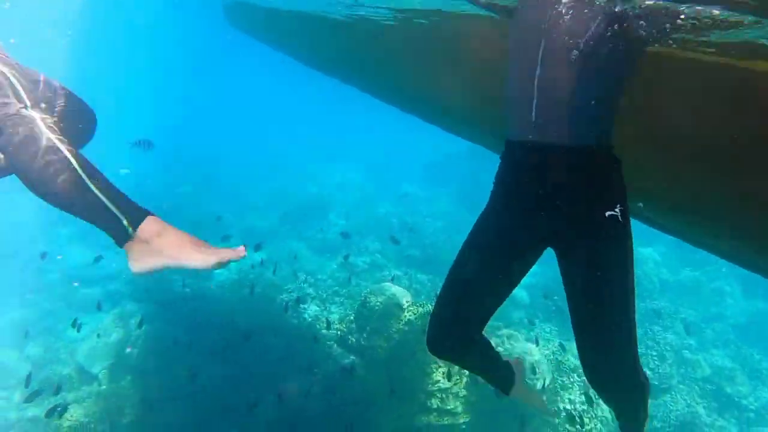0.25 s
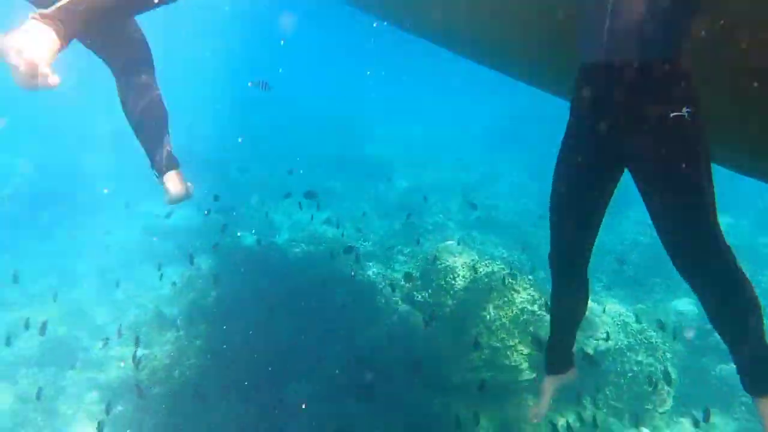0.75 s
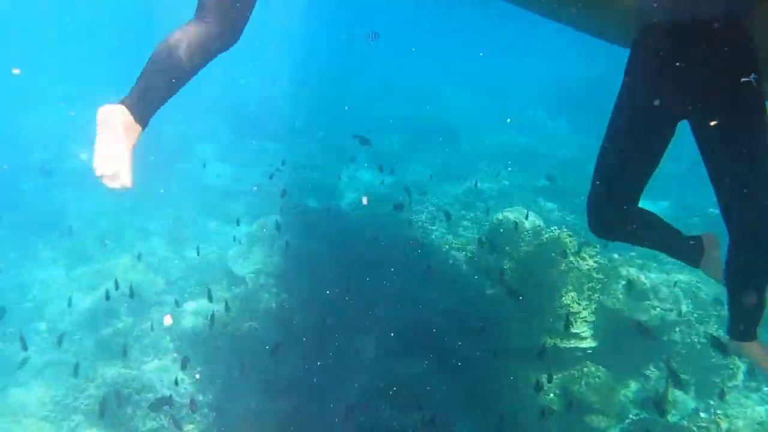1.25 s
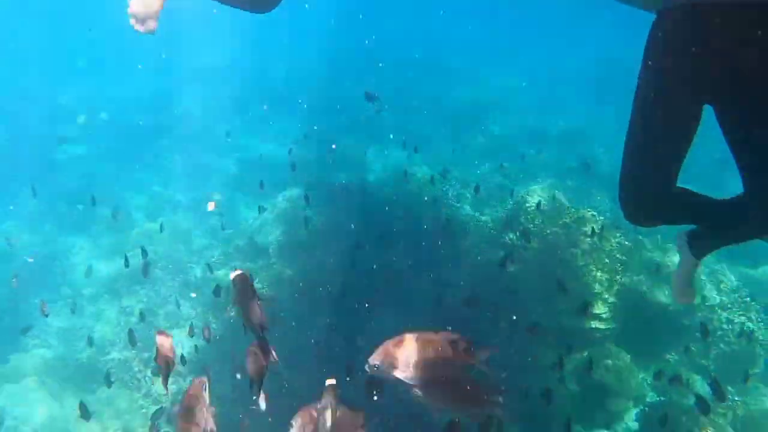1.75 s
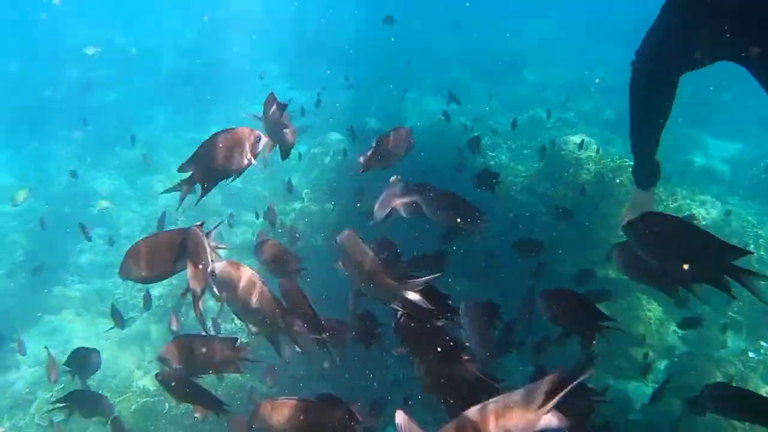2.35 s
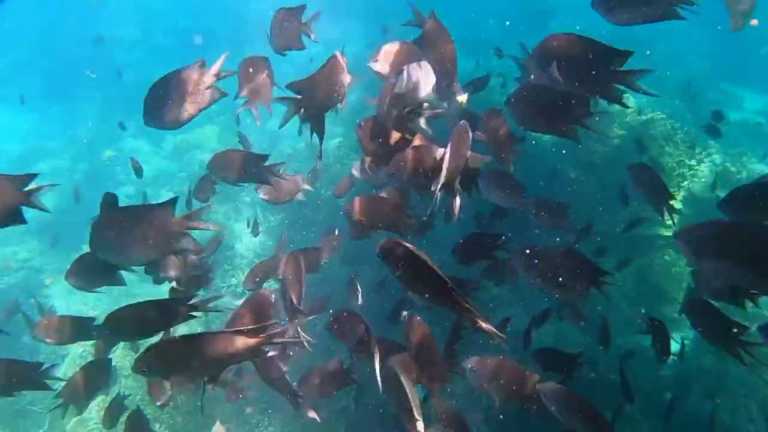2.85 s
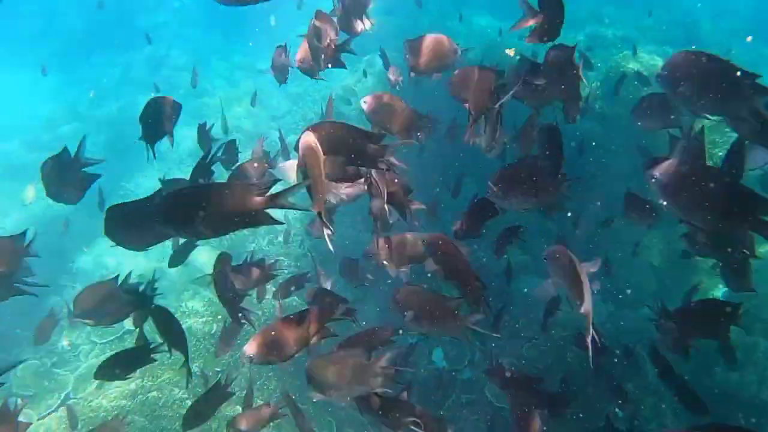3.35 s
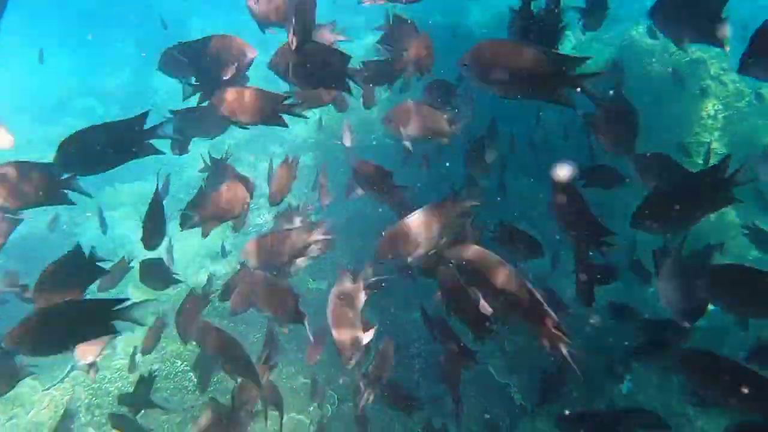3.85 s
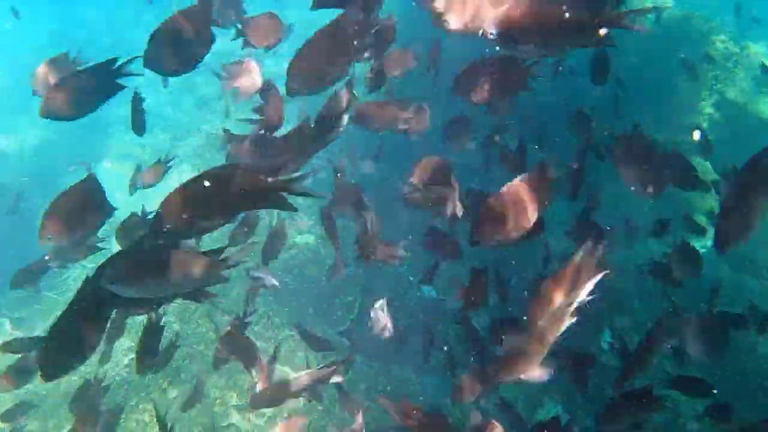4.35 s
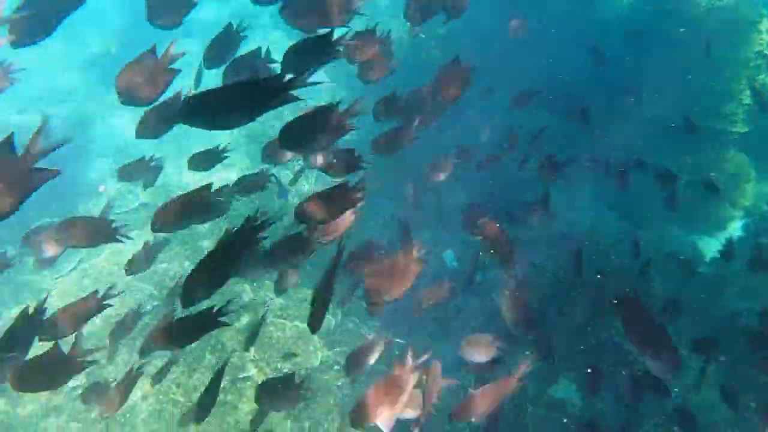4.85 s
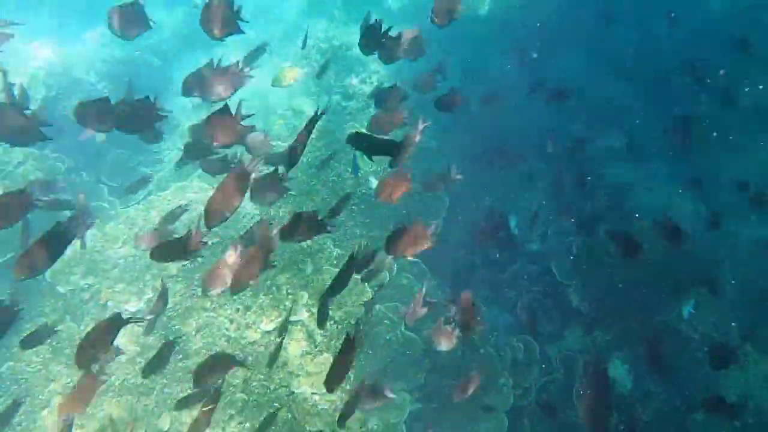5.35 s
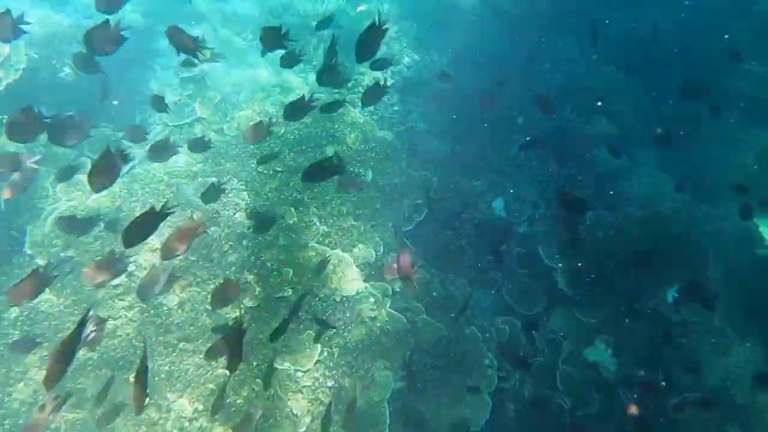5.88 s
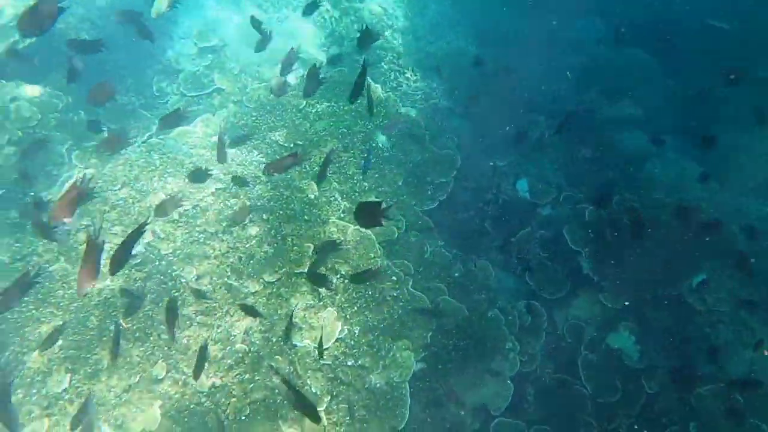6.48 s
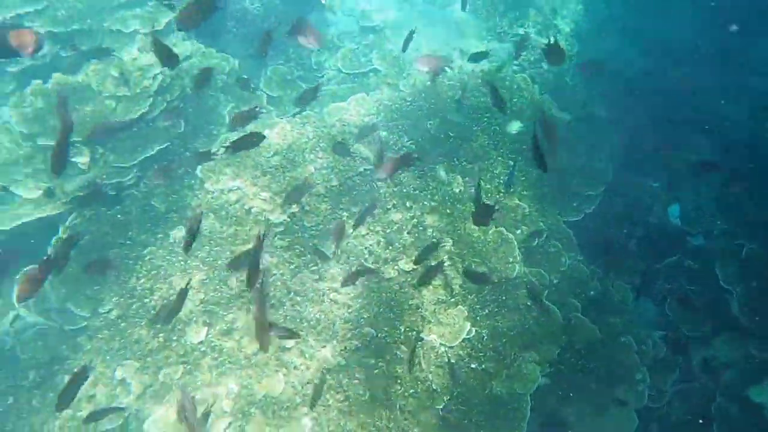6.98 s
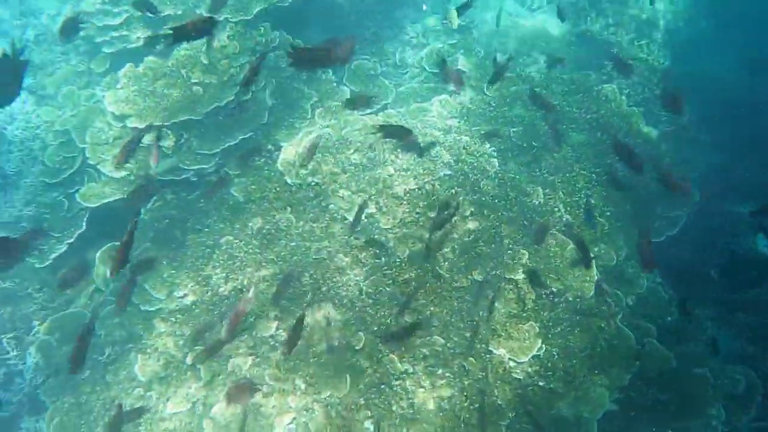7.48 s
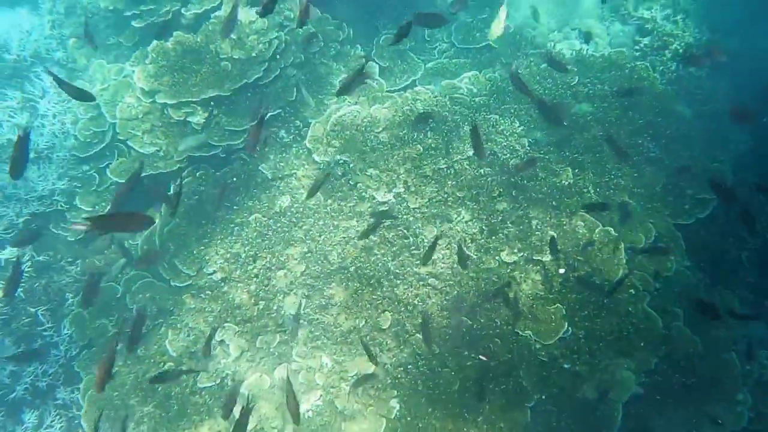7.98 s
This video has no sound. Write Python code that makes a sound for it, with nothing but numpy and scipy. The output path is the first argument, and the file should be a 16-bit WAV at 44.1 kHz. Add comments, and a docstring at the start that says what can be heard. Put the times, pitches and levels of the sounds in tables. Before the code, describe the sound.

Underwater near a coral reef, a boat engine idles with a low, fast throb that swells and recedes. A loose part rattles in buzzing bursts with sharp ticks and small hollow knocks. Water bumps the microphone's waterproof housing with dull, short rings, a few gurgles and small bubbles. Far shrimp crackle faintly. Midway there is a thick cluster of bumps, then churning water grows toward the end. The pickup is close, boxy and muffled.

```python
"""Over a reef, under water: a boat engine idles, heard through a camera's waterproof housing.
Its turns give a low throb of engine orders and noise thuds, hums and knocks; the second order booms in swells.
In spells a loose part rattles, as filtered clicks; sharp bright noise ticks are its louder strikes and some shrimp.
Stray knocks ring the walls. Water bumps the housing (a ring, a splash and a slap), gurgles and bubbles as gliding
tones, and churns as lumpy noise. Far shrimp crackle in the coral as decaying noise clicks."""
import sys
import numpy as np
from scipy import signal
from scipy.fft import rfft, irfft
from scipy.io import wavfile
from scipy.ndimage import uniform_filter1d

SR = 44100
rng = np.random.default_rng(int(sys.argv[2]) if len(sys.argv) > 2 else 0)


def master(y):
    """Save y as 16-bit WAV."""
    cut = np.clip(np.atleast_2d(y).T, -1, 1)
    pcm = np.round(cut * 32767)  # scale
    wavfile.write(sys.argv[1], SR, pcm.astype(np.int16))


N = 362502
TIME = np.arange(N) / SR

# Base level of the hull's thuds: (time [s], level [dB])
THUD_LEVEL = [(0, -34), (.45, -37), (1.25, -29.5), (2.3, -31), (3.2, -24.5), (3.85, -32), (4.7, -30),
              (5.7, -34), (8.2, -34.5)]
# Base level of the engine's knocks: (time [s], level [dB])
KNOCK_LEVEL = [(0, -40.5), (.4, -44.5), (1.35, -38.5), (2, -38), (2.45, -42.5), (3.45, -37.5),
               (3.95, -40.5), (5.1, -38.5), (5.7, -42.5), (8.2, -39)]
# Spectrum of the knocks: (frequency [Hz], level [dB])
KNOCK_COLOUR = [(350, -21.5), (550, -24), (700, -7), (830, -12), (980, -3), (1110, 2.5), (1290, -14.5),
                (1410, -2), (1490, -7.5), (1600, -3), (1760, -1), (1980, -27.5), (2400, -19.5), (3500, -37)]
# Base level of the churning water: (time [s], level [dB])
CHURN_LEVEL = [(0, -46.5), (.5, -51.5), (1.5, -45.5), (2.5, -69), (4.2, -54), (5.0, -39), (5.6, -37),
               (6.4, -33.5), (7.1, -35), (8.2, -33)]
# Water bumping the housing: (time [s], level [dB], ring T60 [s], dull slap against the ring [dB])
BUMPS = [(0.264, -18.5, 0.12, -12), (1.253, -13, 0.12, -14), (1.368, -18.5, .08, -3), (1.384, -16, .13, -7),
         (1.682, -13, 0.11, -9), (1.773, -17, 0.13, -9), (2.116, -19, .11, -9), (3.449, -15.5, 0.11, -9.5),
         (4.392, -19, .12, -1), (4.764, -18.5, .1, -10.5), (4.909, -14, .08, -7), (4.921, -18.5, 0.055, 3),
         (4.936, -15.5, .04, 6.5), (4.949, -9, .15, -2), (4.984, -19.5, .1, 1.5), (5.286, -18, .08, -3.5),
         (5.467, -22.5, .05, 0), (5.897, -17, 0.08, -8), (6.19, -14, .1, -10), (6.277, -15, 0.088, -1.5),
         (6.405, -15.5, 0.13, -10), (6.819, -8, .13, -15), (6.867, -10.5, 0.15, -18),
         (7.07, -16.5, 0.16, -8), (7.375, -17, .12, -10.5)]
# Treble resonances of the housing: (frequency [Hz], width [Hz], lift [dB])
HOUSING = [(2886, 380, 4.5), (4136, 130, 5.5), (4720, 220, 6), (5350, 220, 6.5), (5840, 140, 7),
           (6540, 220, 6), (7540, 600, 5), (9950, 470, 4)]


def amp(db):
    """Decibels to gain."""
    return 10 ** (np.asarray(db) / 20)


def unit(x):
    """Scales to rms 1."""
    return x / np.sqrt(np.mean(x ** 2) + 1e-20)


def curves(table):
    """All columns of a time table at every sample."""
    s, *columns = np.transpose(table)
    return [np.interp(TIME, s, column) for column in columns]


def read(points, hz):
    """Reads a spectrum table on a log-frequency axis."""
    f, value = np.transpose(points)
    return np.interp(np.log(hz + 1), np.log(f + 1), value)


def add(mix, s, sound):
    """Mixes a sound in at time s."""
    part = mix[max(round(s * SR), 0):][:len(sound)]
    part += sound[:len(part)]


def hiss():
    """White noise."""
    return rng.standard_normal(N)


def drift(hz, size=N):
    """Smooth random wander, scaled to rms 1, mostly slower than hz."""
    f = np.fft.rfftfreq(2 ** 19, 1 / SR)
    f = f[f < 4 * hz]
    z = rng.standard_normal((len(f), 2)) @ [1, 1j] * np.exp(-(f / hz) ** 2)
    # The short inverse transform gives one point per 32 samples
    slow = unit(irfft(z, 2 ** 14))
    return np.interp(np.arange(size) / 32, np.arange(len(slow)), slow)


def colour(x, points, peaks=(), size=4096):
    """Minimum-phase filter of unit energy with the given spectrum and resonances."""
    hz = np.fft.rfftfreq(size, 1 / SR)
    # Above the table's end the spectrum falls 12 dB an octave
    db = read(points, hz) - 40 * np.log10(np.maximum(hz / points[-1][0], 1))
    db = db + sum(lift / (1 + (2 * (hz - f) / width) ** 2) for f, width, lift in peaks)
    log_gain = np.log(amp(np.r_[db, db[-2:0:-1]]))
    taps = np.fft.ifft(np.exp(np.conj(signal.hilbert(log_gain)))).real
    return signal.oaconvolve(x, taps / np.linalg.norm(taps))[:len(x)]


def blows(cycles, lag, fall, scatter_db):
    """Envelope of one blow a cycle, lag cycles into it, dying by 1/e in fall cycles; strengths vary at random."""
    turn = cycles - lag + 2
    strength = amp(scatter_db * np.clip(rng.standard_normal(512), -3, 1.5))
    return strength[turn.astype(int)] * np.exp(-(turn % 1) / fall)


def ringing(hits, fall_s):
    """Envelope that spreads each click's energy over a short decay."""
    keep = np.exp(-1 / (fall_s * SR))
    return np.sqrt(signal.lfilter([1 - keep], [1, -keep], hits ** 2 + 1e-20))


def throb(cycles, shake, waver=0.2):
    """Exhaust pulses arrive as a stack of sines at engine orders; the second one booms in swells."""
    # First engine order: (time [s], level [dB])
    first_order = [(0.0, -38), (0.68, -20.5), (0.91, -30), (1.0, -23), (1.19, -30), (1.33, -23.5),
                   (1.99, -21), (2.33, -25), (3.9, -23.5), (4.2, -21), (5.1, -31), (5.38, -20), (6.57, -24),
                   (8.22, -20.5)]
    # Third engine order: (time [s], level [dB])
    third_order = [(0.0, -31), (0.04, -28), (4.28, -25), (4.4, -30), (4.67, -23.5), (5.31, -28),
                   (5.52, -24), (6.39, -27.5), (6.64, -22.5), (6.98, -32), (7.26, -22.5), (8.22, -23)]
    # Swells of the second order: (peak time [s], half width to 1/e [s], level before a 1.5 dB trim [dB])
    booms = [(.8, 0.13, -33), (1.27, 0.16, -23.5), (2.15, 0.49, -16.5), (3.7, 0.46, -16),
             (4.55, .45, -24.5), (5.45, 0.18, -20), (5.96, 0.34, -18), (7.15, 0.4, -17)]
    # Higher orders: (engine order, level when the thuds are at overtone_at_db [dB])
    overtones = [(4, -31.5), (5, -36.5), (6, -43.5), (7, -37.5), (8, -43), (9, -43.5), (14, -47.5),
                 (15, -46)]
    second_order_db = -35.5  # floor between the swells
    half_order_db = -33  # order 3.5, while the hull shakes
    overtone_follow, overtone_at_db = 0.44, -30.5  # share of the thuds' dB changes; reference thud level
    spread = 0.177  # cycles of phase, times order squared

    # Higher orders run faster in shallow water: the phase spread smears each pulse into a drone
    def order(k, sway):
        return np.sin(2 * np.pi * (k * cycles + spread * k ** 2) + sway)

    boom = amp(second_order_db)
    boom = boom + sum(amp(db - 1.5) * np.exp(-((TIME - s) / width) ** 2) for s, width, db in booms)
    gains = amp(curves(first_order)[0]), boom, amp(curves(third_order)[0])
    low = sum(gain * (1 + 0.11 * drift(8)) * order(k, 0.12 * drift(7)) for k, gain in enumerate(gains, 1))
    high = sum(amp(db) * (1 + waver * drift(2.4)) * order(round(k), waver * drift(4.9)) for k, db in overtones)
    high = high * amp(overtone_follow * (curves(THUD_LEVEL)[0] - overtone_at_db))
    half = amp(half_order_db) * shake * order(7 / 2, waver * drift(3))
    return np.sqrt(2) * (low + half + high)


def hull(cycles, shake):
    """Every turn thuds in the hull and sets the housing humming; a four-stroke firing knocks on every second turn."""
    # Spectra of thud and hum: (frequency [Hz], level [dB])
    thud_colour = [(30, -18.5), (60, 3), (100, -3), (130, 2.5), (195, -1.5), (250, -5), (300, -12.5),
                   (420, -34), (700, -46.5)]
    hum_colour = [(180, -38), (290, -13.5), (340, -3.5), (370, 7), (400, -2), (450, -11), (520, -28.5),
                  (900, -54)]
    # Low resonance of the hull: (frequency [Hz], width [Hz], lift [dB])
    hull_mode = [(198, 78, 1.5)]
    hum_db = -45  # without shaking or churning
    shake_thud_db, shake_hum_db = 2.5, 5.5  # boost at full shaking
    hum_over_churn_db = 5  # churning water also sets the housing humming

    thud_db = curves(THUD_LEVEL)[0] + shake_thud_db * shake
    shaken_hum = amp(hum_db + shake_hum_db * shake)
    churned_hum = amp(curves(CHURN_LEVEL)[0] + hum_over_churn_db)
    knock_db = curves(KNOCK_LEVEL)[0]

    thuds = blows(cycles, lag=0.85, fall=0.16, scatter_db=2)
    shakes = blows(cycles, lag=0.03, fall=0.15, scatter_db=2)
    valves = blows(cycles, lag=0.83, fall=0.12, scatter_db=3.5)
    valves = valves + blows(cycles, lag=0.99, fall=0.08, scatter_db=3.5)
    firing = blows(cycles / 2, lag=0.495, fall=0.055, scatter_db=4)
    # Blunted attacks over an uneven steady bed
    strokes = uniform_filter1d(0.5 * valves + 0.75 * firing, size=70) + 0.38 * amp(2.5 * drift(45))

    thud = unit((0.5 + thuds) * hiss()) * amp(thud_db + 0.67)
    hum = unit((0.37 + shakes) * hiss()) * np.hypot(shaken_hum, churned_hum)
    knock = unit(strokes * hiss()) * amp(knock_db - 0.53 + drift(3.1))
    return colour(thud, thud_colour, hull_mode) + colour(hum, hum_colour) + colour(knock, KNOCK_COLOUR)


def spells():
    """Each spell sets in, holds and dies away under an arch of shaking: rattle gain, shaking, strike advance."""
    # Rattling: (start [s], end [s], level at start [dB], level at end [dB], greatest strike advance [cycles])
    spell_list = [(0, 0.106, -54.5, -54, 0), (0.669, 1.651, -45, -45.5, 0.088),
                  (1.72, 2.45, -59.5, -62.5, 0.018), (2.522, 3.438, -52, -45, .13),
                  (4.228, 5.257, -49.5, -53, .16), (6.169, 6.927, -49.5, -51, .15),
                  (7.482, 8.199, -59, -55.5, 0.0085)]
    attack_s, release_s, idle_db = 0.066, 0.11, -72.5  # attack and release times are per 20 dB
    full_shake_db = -50  # spells that start fainter shake the hull less

    gain, shake, advance = np.full(N, amp(idle_db)), np.zeros(N), np.zeros(N)
    for start, end, start_db, end_db, ahead in spell_list:
        outside = np.maximum((start - TIME) / attack_s, (TIME - end) / release_s)
        held_db = np.interp(TIME, [start, end], [start_db, end_db])
        gain += amp(held_db - 20 * np.clip(outside, 0, 10))
        arch = np.sin(np.pi * np.clip((TIME - start) / (end - start), 0, 1) ** 1.17)
        shake += arch * min(amp(start_db - full_shake_db), 1)
        advance += ahead * arch ** 0.75
    return gain, shake, advance


def bounce(x):
    """A click crosses the housing back and forth: feedback delays make a quick train of echoes."""
    for delay_s in (0.0006, 0.00047):  # round trips
        loop = np.r_[1, np.zeros(round(delay_s * SR) - 1), -0.45]  # share kept on each trip
        x = signal.lfilter(loop[::-1], loop, x)  # all-pass: keeps the click's spectrum
    return x


def rattle(cycles, gain, advance):
    """The loose part strikes once a turn with a sharp tick, falls back more softly and chatters when shaken hard."""
    # Spectrum of the ticks: (frequency [Hz], level [dB])
    rattle_colour = [(1180, -38), (2000, -1.5), (2200, -13), (2480, -7), (2860, 0.5), (3430, -20),
                     (3840, -11.5), (4120, -2.5), (4640, -4), (5060, -11.5), (5420, -8.5), (6590, -12),
                     (7060, -17.5), (7710, -15.5), (8960, -29.5), (11600, -42.5), (19700, -120)]
    strike_lag, rebound_lag, jitter = 0.16, 0.431, 0.011  # cycles
    rebound_share = 0.45  # strength against the strike
    strike_scatter_db, rebound_scatter_db = 1.7, 4
    limp = 0.12  # share of the advance by which alternate turns differ from it
    chatter_per_s, chatter_at_db = 60, -44  # slip rate at this rattle level; grows with gain squared
    grit_db, grit_s = -1.5, 0.0014  # rough contact adds a little noise to each tick
    clatter_hz, clatter_wander, clatter_db = 2780, 0.08, -12  # the part's own ring, different at each strike

    turns = np.arange(int(cycles[-1]) + 1)
    ahead = np.interp(turns, cycles, advance)
    strike = strike_lag - ahead * (1 - limp * (-1) ** turns), 1, strike_scatter_db
    rebound = rebound_lag - ahead / 2, rebound_share, rebound_scatter_db
    slips_per_s = chatter_per_s * (gain / amp(chatter_at_db)) ** 2
    hits = (rng.random(N) < slips_per_s / SR) * rng.random(N) / 2
    for lag, share, scatter_db in strike, rebound:
        slip, force = rng.standard_normal((len(turns), 2)).T
        at = np.searchsorted(cycles, turns + lag + jitter * slip)
        inside = at < N
        hits[at[inside]] += share * amp(scatter_db * np.minimum(force, 1))[inside]
    # One unit tick a turn, with its grit, would have rms equal to the gain
    hits *= gain * np.sqrt(N / len(turns) / (1 + amp(2 * grit_db)))
    grit = amp(grit_db) * ringing(hits, grit_s) * hiss()
    angle = 2 * np.pi * np.cumsum(clatter_hz * (1 + clatter_wander * drift(25))) / SR
    wandering_ring = drift(200) * np.sin(angle) + drift(200) * np.cos(angle)
    clatter = ringing(hits, 0.0018) * wandering_ring
    return colour(bounce(hits + grit), rattle_colour, HOUSING) + amp(clatter_db) * clatter


def bright_ticks():
    """Sharp bright ticks, louder strikes of the loose part and some shrimp snaps: brief noise with a lifted band."""
    # Spectrum of the ticks: (frequency [Hz], level [dB])
    tick_colour = [(900, -25.5), (1900, -3), (2900, -2.5), (3450, -5), (4400, -3), (6500, -3),
                   (8000, -11.5), (9500, -22), (12000, -31.5), (14000, -43.5)]
    # (time [s], level before a 4 dB trim [dB], lifted frequency [Hz])
    ticks = [(.578, -29, 5500), (0.599, -31.5, 7000), (0.788, -22, 4830), (1.0928, -25.5, 2910),
             (1.5, -24.5, 2870), (1.616, -28, 7000), (1.627, -27, 4520), (1.923, -25, 2790),
             (2.229, -30.5, 2180), (2.508, -23, 2870), (3.405, -22, 2860), (3.9432, -30, 3070),
             (4.7345, -28.5, 4660), (5.8, -36, 3000), (6.8662, -28.5, 2330), (7.2672, -28, 3010),
             (7.517, -32, 6000), (7.6413, -18.5, 2330), (7.863, -37, 5520), (7.978, -32, 7000),
             (7.9886, -22, 3020)]
    out, t = np.zeros(N), np.arange(SR // 20) / SR
    for s, db, hz in ticks:
        burst = (np.exp(-t / 0.0015) + 0.12 * np.exp(-t / 0.009)) * rng.standard_normal(len(t))
        add(out, s, amp(db - 4.0) * colour(burst, tick_colour, HOUSING + [(hz, 1100, 7)]))
    return out


def knocks():
    """Hard firings, stray knocks and faint random ones ring the housing's walls briefly: a sine and a noise crack."""
    # Stray knocks: (time [s], level [dB], pitch [Hz], ring T60 [s], crack against the ring [dB])
    stray = [(.527, -34.5, 2900, 0.034, -15), (1.057, -24, 1620, 0.036, -8),
             (1.093, -20.5, 2860, 0.021, -15), (1.66, -23.5, 1106, 0.033, -9),
             (1.684, -23, 1690, 0.031, -5), (3.376, -25, 1520, .04, -8), (3.971, -24.5, 1094, .04, -9),
             (4.935, -19, 1040, 0.027, -12), (5.286, -20, 990, 0.038, -5), (6.25, -29, 2760, .03, -12),
             (6.429, -28, 1700, .04, -8), (6.432, -20.5, 734, 0.041, -11), (6.762, -24, 1075, 0.044, -7.5),
             (6.817, -15.5, 1065, 0.017, 0.5), (7.079, -26.5, 1440, 0.023, -2), (7.22, -16, 940, 0.023, -5),
             (7.222, -17, 1425, 0.022, -6), (7.641, -22, 1710, .02, -2.5), (7.812, -22.5, 1000, .04, -7)]
    # Hard firings that ring the wall: (time [s], level [dB])
    hard_firings = [(1.822, -19.5), (1.903, -20), (1.986, -22.5), (2.064, -19.5), (2.145, -28),
                    (2.225, -28.5), (3.283, -29), (3.444, -26.5), (3.523, -22.5), (3.604, -30),
                    (3.687, -20), (3.767, -20.5), (3.849, -31), (4.661, -23.5), (4.74, -20), (4.818, -20.5),
                    (5.165, -20), (5.228, -22), (5.307, -18.5), (5.388, -25.5), (5.466, -23), (5.73, -23.5)]
    # Pitches of the faint knocks: each rings one wall mode [Hz]
    wall_modes = [1000, 1105, 1420, 1760]
    wall_hz, wall_t60_s, wall_crack_db = 1100, 0.035, -11
    small_per_s, small_over_db, small_scatter_db = 9, 6.5, 1  # faint knocks, against the engine's knock level

    out, t = np.zeros(N), np.arange(SR // 8) / SR
    hard = [(s, db, wall_hz, wall_t60_s, wall_crack_db) for s, db in hard_firings]
    small = []
    for s in TIME[rng.random(N) < small_per_s / SR]:
        db = np.interp(s, *np.transpose(KNOCK_LEVEL)) + small_over_db + small_scatter_db * rng.standard_normal()
        small.append((s, db, rng.choice(wall_modes), wall_t60_s, wall_crack_db))
    for s, db, hz, t60, crack_db in stray + hard + small:
        ring = np.sin(2 * np.pi * hz * t)
        crack = colour(rng.standard_normal(len(t)), KNOCK_COLOUR)
        envelope = amp(db + 2.5 - 60 * t / t60) * (1 - np.exp(-t / 0.0023))
        add(out, s, envelope * (ring + amp(crack_db) * crack))
    return out


def bumps():
    """Pushes of water slap the housing, splash and ring its low mode."""
    # Spectrum of the splash: (frequency [Hz], level [dB])
    splash_colour = [(120, -11.5), (260, 8.5), (400, 4.5), (540, -20), (700, -8), (900, -18.5), (1400, -15),
                     (1800, -12.5), (2400, -27.5), (5000, -64.5)]
    ring_hz, rise_s = 367.2, 0.0027  # the ring's pitch varies around this
    splash_db = -19.5
    slap_s = 0.0008  # half width of the slap's pressure pulse

    out, t = np.zeros(N), np.arange(SR // 4) / SR
    u = (t - rise_s) / slap_s
    slap = u * np.exp((1 - u ** 2) / 2)
    for s, db, t60, slap_db in BUMPS:
        hz = ring_hz * (1 + 0.015 * rng.standard_normal() + 0.018 * drift(40, size=len(t)))
        ring = np.sin(2 * np.pi * np.cumsum(hz) / SR) * amp(drift(60, size=len(t)))
        splash = colour(amp(splash_db) * rng.standard_normal(len(t)), splash_colour)
        push = amp(3.5 - 60 * t / t60) * (1 - np.exp(-(t / (2 * rise_s)) ** 2))
        add(out, s - rise_s / 2, amp(db) * (push * (ring + splash) + amp(slap_db) * slap))
    return out


def gurgles():
    """Pockets of air ring and glide in pitch; ragged ones flutter."""
    # (time [s], length [s], level [dB], start pitch [Hz], end pitch [Hz], roughness [0-1])
    air_pockets = [(0.022, 0.03, -13, 205, 228, .05), (0.017, 0.05, -24.5, 370, 360, 0.32),
                   (4.292, 0.055, -23, 490, 450, 0.52), (4.292, .055, -14.5, 400, 385, 0.29),
                   (4.337, 0.05, -13, 362, 393, 0.11), (4.29, 0.097, -22, 280, 290, 0.9),
                   (4.96, 0.064, -18.5, 375, 355, 0.15), (4.89, .075, -24, 175, 290, .3),
                   (4.955, .065, -26.5, 285, 215, .2), (4.955, 0.06, -31.5, 740, 620, 0.5),
                   (4.99, 0.255, -18.5, 162, 88, 0.08), (1.658, .04, -22.5, 205, 350, 0.2),
                   (.81, .03, -41, 1370, 1420, 0.3), (1.1, 0.018, -33.5, 1450, 1390, 0.1),
                   (1.39, 0.022, -34.5, 1400, 1330, 0.2), (3.637, 0.033, -42, 2660, 2750, 0.9)]
    out = np.zeros(N)
    for s, length, db, start_hz, end_hz, rough in air_pockets:
        size = int(length * SR)
        angle = 2 * np.pi * np.cumsum(np.geomspace(start_hz, end_hz, size)) / SR
        spread_hz = 40 + 0.13 * start_hz  # small, high pockets flutter faster
        flutter = drift(spread_hz, size=size) * np.sin(angle) + drift(spread_hz, size=size) * np.cos(angle)
        tone = (1 - rough) * np.sin(angle) + rough * flutter
        swell = np.sin(np.pi * np.arange(size) / size) ** 0.5
        add(out, s, amp(db) * unit(tone) * swell)
    return out


def bubbles():
    """Small bubbles ring and rise in pitch: a steady supply that follows the churn's level, and some shed by each bump."""
    per_s, over_churn_db, scatter_db = 55, 4, 3.5
    low_hz, high_hz = 447, 1900  # range of starting pitches
    slope_db = -7  # per octave: small bubbles are fainter
    fall_cycles, rise = 3.9, 0.028  # cycles to die by 1/e; share by which the pitch rises meanwhile
    shed_s, shed_db = 0.014, -19  # spread around a bump; level against the bump's

    out, t = np.zeros(N), np.arange(SR // 16) / SR
    stirred = [(s, np.interp(s, *np.transpose(CHURN_LEVEL)) + over_churn_db)
               for s in TIME[rng.random(N) < per_s / SR]]
    shed = [(s + shed_s * chance, db + shed_db)
            for s, db, _, _ in BUMPS for chance in rng.standard_normal(size=4)]
    for s, db in stirred + shed:
        octaves = rng.random() * np.log2(high_hz / low_hz)
        turns = low_hz * 2 ** octaves * t
        age = turns / fall_cycles
        scatter = scatter_db * np.clip(rng.standard_normal(), -2, 2)
        envelope = amp(db + slope_db * octaves + scatter) * (1 - np.exp(-turns)) * np.exp(-age)
        add(out, s, envelope * np.sin(2 * np.pi * turns * (1 + rise * age / 2)))
    return out


def churn():
    """Lumpy noise wash of stirred water, close enough to differ between the ports."""
    # Spectrum of the wash: (frequency [Hz], level [dB])
    churn_colour = [(150, -29), (280, -12.5), (370, 0), (440, -0.5), (500, -3), (550, -15.5), (610, -2.5),
                    (645, -12.5), (700, -2.5), (850, -17.5), (1100, -18), (1400, -27.5), (2500, -39)]
    shared, apart = (colour(hiss() * amp(curves(CHURN_LEVEL)[0] - 1 + 3.5 * drift(34)), churn_colour)
                     for _ in range(2))
    apart = signal.sosfilt(signal.butter(2, 430, "highpass", fs=SR, output="sos"), apart)
    # The second wash has opposite signs at the two ports
    return ports(shared) + amp(-14.0) * np.array([apart, -apart])


def reef(cycles):
    """Far shrimp crackle as short noise clicks of random strength, over faint engine hiss."""
    # Spectrum of crackle and hiss: (frequency [Hz], level [dB])
    fizz_colour = [(1120, -29), (1900, -1), (2200, -7), (2550, -20.5), (2850, -3.5), (3300, -15),
                   (3650, -12), (4100, -12), (4900, -14.5), (5950, -18), (7500, -17.5), (8960, -27.5),
                   (11600, -44), (19700, -100)]
    # Level of the far shrimp: (time [s], level [dB])
    crackle_level = [(0, -59.5), (.5, -56), (1.5, -55.5), (6, -56), (8.2, -57)]

    clicks = (rng.random(N) < 220 / SR) * amp(4.6 * np.minimum(rng.exponential(1, N), 4))  # 220 a second
    crackle = signal.lfilter([1], [1, -np.exp(-1 / (0.00083 * SR))], clicks) * hiss()
    engine_hiss = (2.5 + 2 * blows(cycles, lag=0.74, fall=0.6, scatter_db=6.0)) * hiss()
    far = amp(curves(crackle_level)[0]) * unit(crackle)
    far = far + amp(curves(KNOCK_LEVEL)[0] - 16.5) * unit(engine_hiss)
    return colour(far, fizz_colour, HOUSING)


def ports(x, size=2 ** 19):
    """Sound reaches the two microphone ports with different phase and strength, plus a little scatter."""
    # (frequency [Hz], lead of the left port [rad])
    port_phase = [(0, 0), (430, 0.2), (690, -1.4), (1210, 0.1), (1890, -1.3), (2410, -0.7), (3190, -1.4),
                  (3880, -0.0), (4220, -0.4), (4570, -0.0), (6120, -0.2), (6370, 0.0), (7670, -0.2),
                  (8700, 0.1)]
    # (frequency [Hz], left over right [dB])
    port_balance = [(60, 0.5), (88, 0.5), (130, 0.0), (190, 0.0), (280, 0.5), (400, 2.0), (590, 1.5),
                    (860, -2.5), (1270, 0.0), (1850, 2.0), (2710, 2.0), (3970, -3.0), (5810, -2.0),
                    (8510, 0.5)]
    # (frequency [Hz], likeness of the ports [0-1]); lower values bring more scatter
    port_likeness = [(60, 1.0), (100, 1.0), (180, 1.0), (420, 1.0), (540, 0.6), (940, 0.76), (1630, 0.61),
                     (2830, 0.35), (4910, 0.79), (8510, 0.83)]

    hz, z = np.fft.rfftfreq(size, 1 / SR), rfft(x, size)
    phase = np.interp(hz, *np.transpose(port_phase))
    lean = amp(read(port_balance, hz) / 2) * np.exp(0.5j * phase)
    pair = np.array([lean, 1 / lean])
    pair = pair / np.maximum(abs(pair.mean(0)), 0.55)  # makes up, within a limit, for loss in the ports' mean
    t = np.arange(SR // 25) / SR
    echoes = rng.standard_normal(len(t)) * np.exp(-t / 0.007)
    likeness = np.clip(read(port_likeness, hz), 0, 1)
    scatter = 0.7 * np.sqrt((1 - likeness) / (1 + likeness))
    scatter = scatter * rfft(echoes / np.linalg.norm(echoes), size)
    return irfft(z * (pair + np.array([scatter, -scatter])), size)[:, :N]


def scene():
    """Engine, water and reef, all heard through the housing."""
    # Engine speed: (time [s], turns per second [Hz])
    engine_speed = [(0.0, 24.75), (0.59, 24.674), (1.17, 24.649), (1.76, 24.774), (2.35, 24.639),
                    (2.94, 24.555), (3.52, 24.855), (4.11, 24.518), (4.7, 24.586), (5.28, 24.933),
                    (5.87, 24.768), (6.46, 24.59), (7.05, 24.882), (7.63, 24.452), (8.22, 24.688)]
    cycles = np.cumsum(curves(engine_speed)[0]) / SR
    gain, shake, advance = spells()
    engine = throb(cycles, shake) + hull(cycles, shake) + rattle(cycles, gain, advance)
    water = bumps() + gurgles() + bubbles()
    return ports(engine + bright_ticks() + knocks() + water + reef(cycles)) + churn()


def record(dry):
    """The recorder's band limit: a linear-phase low-pass."""
    edge_hz = 14000
    low_pass = signal.firwin(255, edge_hz, window=("kaiser", 9), fs=SR)
    return signal.oaconvolve(dry, low_pass[None], "same")


dry = scene()
out = record(dry)
master(out)
```